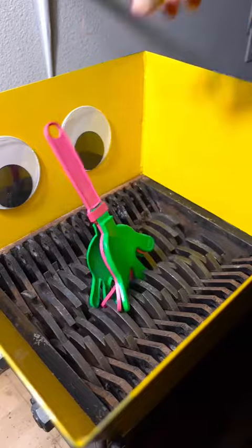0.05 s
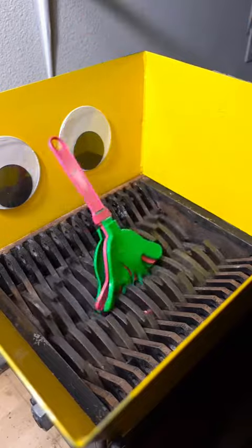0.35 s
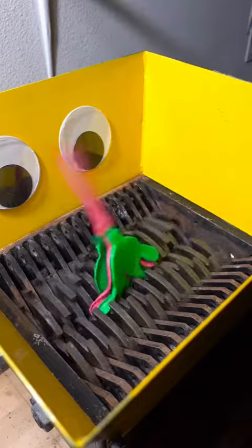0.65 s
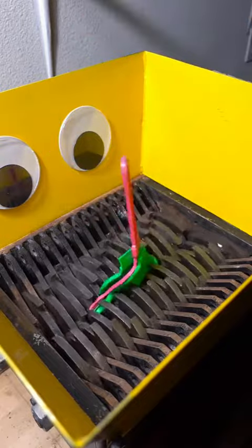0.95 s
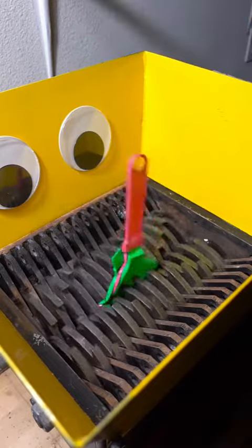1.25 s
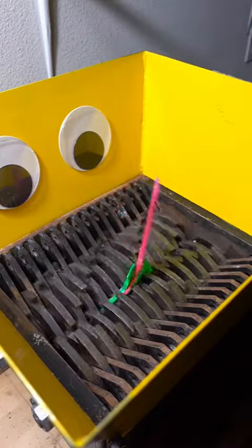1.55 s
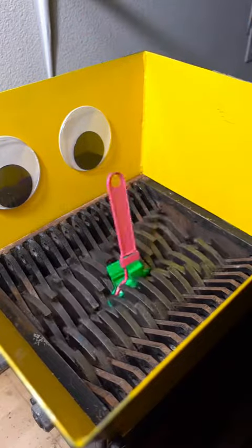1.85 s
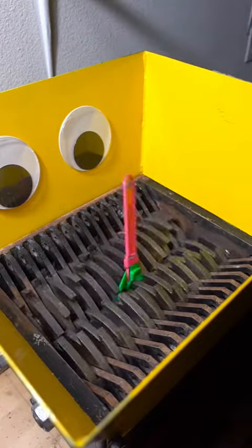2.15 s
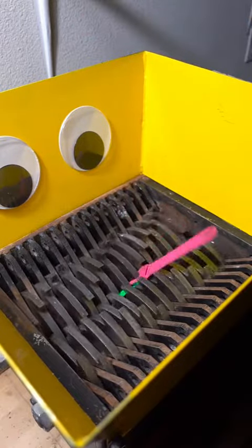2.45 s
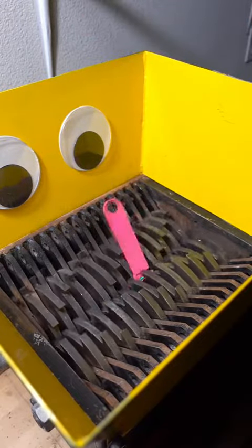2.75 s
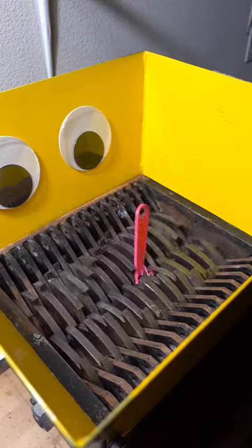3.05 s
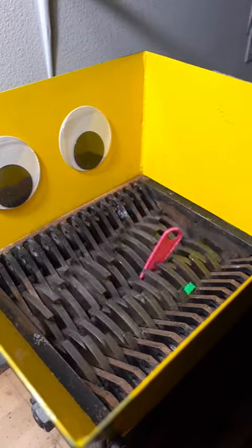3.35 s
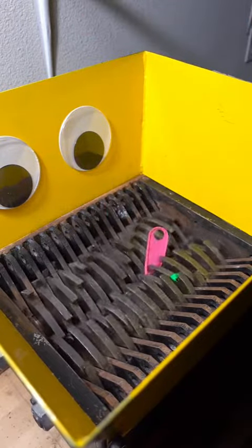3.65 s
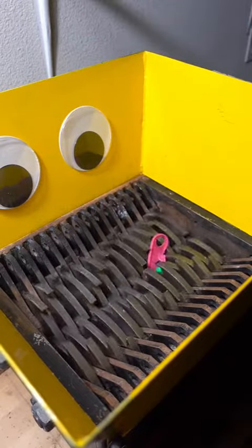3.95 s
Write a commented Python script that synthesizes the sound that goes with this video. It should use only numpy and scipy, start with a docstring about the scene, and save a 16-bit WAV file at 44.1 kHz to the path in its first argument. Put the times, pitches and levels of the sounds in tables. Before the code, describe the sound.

An industrial shredder crunches hard plastic with dense crackling and snaps over a machine hum.

```python
"""A twin-shaft shredder chews up a hard plastic toy, close to the microphone.
From the start, motor and gears hum under a dense crackle of tiny fractures and clicking splinters.
In the first second the bending plastic creaks; pieces start to snap, and the cutters thud until 2.2 s.
Snaps and crackle then thin out as the toy is used up, and the gears run on, louder.
Throughout, the steel hopper and the workshop add a bright tail to the breaking plastic."""
import sys
import numpy as np
from scipy import signal
from scipy.fft import rfft, irfft, next_fast_len
from scipy.io import wavfile
from scipy.ndimage import map_coordinates

SR = 44100
rng = np.random.default_rng(int(sys.argv[2]) if len(sys.argv) > 2 else 0)


def log_audio(samples):
    """Write samples as a 16-bit WAV file to the path given in sys.argv[1]."""
    # one column per channel
    frames = np.atleast_2d(samples).T
    # limit to full scale, then quantise
    limited = np.clip(frames, -1, 1)
    pcm = np.round(limited * 32767).astype(np.int16)
    wavfile.write(sys.argv[1], SR, pcm)


N = 176400

# Spectrum of a fracture. Each row: frequency in Hz, gain in dB.
CRACK_SPECTRUM = [(30, -26), (300, -14), (700, -7), (1300, -3), (2500, 1.5), (6200, 1.5), (6800, -2),
                  (10000, -2), (15500, -6)]
# Course of the crushing. Each row: time in seconds, relative levels of crackle and crunch in dB.
CRUSH_LEVELS = [(0, -16, -21.5), (.2, -29.5, -18), (.36, -20.5, -24.5), (.40, -26, -35), (.56, -23, -25.5),
                (.6, -26, -23.5), (.69, -18.5, -18.5), (.79, -25, -21), (.94, -20.5, -24.5),
                (1.11, -22.5, -23), (1.37, -25.5, -26), (1.43, -20.5, -27), (1.54, -23.5, -40),
                (1.65, -19.5, -30), (1.75, -25.5, -28.5), (2.01, -29.5, -32), (2.282, -25.5, -49),
                (2.41, -42, -39.5), (2.45, -29, -51), (2.622, -22.5, -33), (2.69, -31, -48.5),
                (2.8, -49.5, -33.5), (2.82, -26.5, -27.5), (2.95, -25.5, -36), (2.985, -45, -49),
                (3.041, -30, -29), (3.16, -55, -39.5), (3.4, -40, -38.5), (3.585, -51, -43),
                (3.61, -26, -45), (3.72, -42.5, -39.5), (3.95, -49, -43.5)]
PIECE_WIDTH = 0.229  # side over middle


def amp(db):
    """Decibels to gain."""
    return 10 ** (np.asarray(db) / 20)


def unit(x):
    """x at rms 1."""
    return x / np.sqrt(np.mean(x ** 2) + 1e-20)


def along(points, hz):
    """Interpolate (Hz, value) points on a log axis."""
    f, v = np.transpose(points)
    return np.interp(np.log(hz + 1), np.log(f + 1), v)


def curves(rows):
    """One value per sample for each column after the time."""
    times_s, *columns = np.transpose(rows)
    return [np.interp(np.arange(N) / SR, times_s, column) for column in columns]


def wobble(knots_per_s):
    """A smooth random curve."""
    return map_coordinates(rng.standard_normal(N // 40), [np.arange(N) * knots_per_s / SR], mode="wrap")


def filtered(x, response):
    """x through a complex frequency response."""
    n = x.shape[-1]
    padded = next_fast_len(n + n // 10, True)
    return irfft(rfft(x, padded) * response(np.fft.rfftfreq(padded, 1 / SR)), padded)[..., :n]


def coloured(x, spectrum):
    """Stereo x through a minimum-phase filter of the given (Hz, dB) shape."""
    size = 2048
    cepstrum = irfft(np.log(amp(along(spectrum, np.fft.rfftfreq(size, 1 / SR)))))
    cepstrum[1:size // 2] *= 2
    cepstrum[size // 2 + 1:] = 0
    impulse = irfft(np.exp(rfft(cepstrum)))
    return signal.oaconvolve(x, impulse[None], axes=1)[:, :x.shape[1]]


def resonance(f, hz, q):
    """Response at f of one damped mode."""
    return 1j * f * hz / (hz * hz - f * f + 1j * f * hz / q)


def ringing(x, hz, q):
    """x through two equal resonances in series, at rms 1."""
    return unit(filtered(x, lambda f: resonance(f, hz, q) ** 2))


def stereo(pair, width):
    """Two unrelated signals as middle and side."""
    return np.array([pair[0] + width * pair[1], pair[0] - width * pair[1]]) / np.hypot(1, width)


def add(track, start_s, sound):
    """Mix a sound in."""
    part = track[:, round(start_s * SR):][:, :sound.shape[-1]]
    part += sound[..., :part.shape[1]]


def machine():
    """Rattling gears ring the steel gearbox, the frame drones, the loaded motor gives a rough whine."""
    # Each row: time in seconds, levels of gears, drone and whine in dB.
    levels = [(0, -47.5, -49, -48), (2.6, -41.5, -58.5, -48), (3.15, -37.5, -45.5, -45.5),
              (3.78, -35.5, -60.5, -49), (4, -33.5, -40, -51)]
    # Gearbox noise. Each row: frequency in Hz, gain in dB.
    gear_spectrum = [(90, -35.5), (150, -21.5), (330, -3.5), (460, -7.5), (620, 3.5), (1050, -1.5),
                     (2700, -1), (3500, -13.5), (12000, -34)]
    # Steel modes rung by the meshing teeth. Each row: frequency in Hz, level against the noise in dB.
    gear_modes = [(140, -26.5), (361, -17), (561, -12.5), (1297, -13.5), (1450, -15), (1505, -12.5),
                  (1960, -8), (2385, -11.5), (2818, -9.5), (3015, -16)]
    whine_hz, bandwidth_hz, width = 676.5, 15.07, 0.104
    gears_db, drone_db, whine_db = curves(levels)
    flutter = amp(wobble(45))
    gears = flutter * unit(coloured(stereo(rng.standard_normal((2, N)), width), gear_spectrum))
    for hz, db in gear_modes:
        gears += amp(db) * ringing(stereo(rng.standard_normal((2, N)), width), hz, q=hz / bandwidth_hz)
    drone = ringing(rng.standard_normal(N), hz=333.4, q=2.6)
    whine = np.sin(2 * np.pi * whine_hz * np.arange(N) / SR)
    whine += ringing(rng.standard_normal(N), whine_hz, q=whine_hz / bandwidth_hz)
    return amp(gears_db) * gears + amp(drone_db) * drone + amp(whine_db) * unit(whine)


def crushing():
    """Surging clumps of tiny fractures: thin edges crackle brightly, thick walls crunch lower."""
    # Thin edges. Each row: frequency in Hz, gain in dB.
    crackle_spectrum = [(30, -14), (400, -16.5), (1200, -13), (3000, 4.5), (11000, 3), (15500, -1.5)]
    # Thick walls. Each row: frequency in Hz, gain in dB.
    crunch_spectrum = [(30, -23.5), (250, -27.5), (620, -6), (1000, -8), (2200, 2.5), (3500, 0),
                       (9000, -14.5)]
    fractures_per_s, clumps_per_s, surges_per_s = 5000, 200, 40
    crackle_db, crunch_db = curves(CRUSH_LEVELS)
    out, shared_clumps = np.zeros((2, N)), wobble(clumps_per_s)
    for db, spectrum, width in (crackle_db, crackle_spectrum, 0.936), (crunch_db, crunch_spectrum, 0.55):
        breaks = (rng.random((2, N)) < fractures_per_s / SR) * rng.standard_normal((2, N))
        clump_db = 5 * np.tanh((shared_clumps + wobble(clumps_per_s)) / 2)
        surge_db = 2 * wobble(surges_per_s)
        breaks *= amp(clump_db + surge_db)
        out += amp(db - 1.5) * unit(coloured(stereo(breaks, width), spectrum))
    return out


def fracture(length_s, hz, crack_db):
    """A crack runs as a volley of tiny breaks, hardest first, and rings the piece that gives way."""
    release_s, first_break_s, first_break_db = 0.00255, 0.000152, 5.5
    q, overtone_ratio, overtone_db = 7.43, 1.856, -25
    t = np.arange(SR // 30) / SR
    envelope = np.exp(-np.maximum(t - length_s, 0) / release_s)
    envelope *= amp(first_break_db * np.exp(-t / first_break_s))
    noise = rng.standard_normal((3, len(t)))
    breaks = envelope * noise[:2] * np.exp(0.584 * noise[2])  # log-normal spikes
    crack = coloured(stereo(breaks, PIECE_WIDTH), CRACK_SPECTRUM)
    ring = filtered(crack.mean(axis=0),
                    lambda f: resonance(f, hz, q) - amp(overtone_db) * resonance(f, hz * overtone_ratio, q))
    return np.sqrt(np.mean(envelope ** 2)) * unit(unit(ring) + amp(crack_db) * unit(crack))


def splinters():
    """Small pieces click off: a few loud and dry, and faint random ones that follow the crackle level."""
    # Each row: start in seconds, relative level in dB.
    loud_clicks = [(.019, -11.5), (0.105, -12.5), (0.128, -10), (.182, -14), (.269, -14), (.316, -21.5),
                   (0.575, -14.5), (.640, -18.5), (0.93, -12.5), (1.055, -9), (1.443, -11.5), (1.561, -13),
                   (1.61, -14.5), (1.781, -8.5), (1.954, -11.5), (2.375, -14.5), (2.435, -17.5),
                   (2.478, -15.5), (2.526, -16.5), (2.814, -17.5), (2.890, -20), (3.053, -18),
                   (3.396, -25.5)]
    splinter_hz, faint_per_s, longest_s = 3470, 55, 0.00265
    out, crackle_db = np.zeros((2, N)), curves(CRUSH_LEVELS)[0]
    draws = rng.random((400, 4))
    for start_s, db in loud_clicks:
        hz = splinter_hz * 2 ** rng.uniform(-1.25, 0.622)
        add(out, start_s, amp(db - 3.5) * fracture(length_s=0.0019, hz=hz, crack_db=20))
    for k, (delay, size, pitch, weakness) in enumerate(draws):
        start_s = (k + 2 * delay) / faint_per_s
        if start_s * SR < N:
            db = crackle_db[int(start_s * SR)] + 3.5 - 20 * weakness
            hz = splinter_hz * 2 ** (2 * pitch - 1)
            add(out, start_s, amp(db) * fracture(longest_s * size, hz, crack_db=0))
    return out


def creaks():
    """The wall bends and slips in quick, uneven jerks along a cutter, ringing the hollow shell."""
    # Each row: start in seconds, length in seconds, level in dB.
    bends = [(0.223, 0.1435, -20.5), (0.569, 0.0814, -20)]
    out, slips_per_s = np.zeros((2, N)), 450
    for start_s, length_s, db in bends:
        t = np.arange(int(length_s * SR)) / SR
        rate_hz = slips_per_s * amp(4 * wobble(slips_per_s)[:len(t)])
        slips = np.diff(np.floor(np.cumsum(rate_hz) / SR), prepend=0)
        jerks = stereo(slips * rng.standard_normal((2, len(t))), PIECE_WIDTH)
        swell = np.sqrt(np.abs(np.sin(np.pi * t / length_s)))
        add(out, start_s, amp(db) * swell * ringing(jerks, hz=2438, q=3.1))
    return out


def snaps():
    """The large pieces break one by one."""
    # Each row: start in seconds, nominal length in seconds, relative level in dB,
    # pitch of the piece in Hz, relative weight of the crack in dB.
    pieces = [(0.2888, 0.00605, -6, 2484, 0.5), (0.348, 0.0149, -14.5, 2120, 1.5),
              (0.473, 0.00292, -7.5, 3720, 6.5), (.493, 0.00132, -12.5, 2880, -4.5),
              (0.524, 0.0074, -9.5, 2150, 4), (.603, 0.00326, -6.5, 1380, 3.5),
              (0.712, 0.00407, -7.5, 4570, 14), (0.746, 0.0027, -11.5, 3340, -7.5),
              (0.8, 0.00208, -8, 1184, 1.5), (.841, 0.00345, -9.5, 2240, 2.5),
              (0.870, 0.0065, -9.5, 1640, 4.5), (0.954, 0.00388, -5.5, 2427, 8),
              (1.075, 0.004, -7, 2006, 1), (1.081, 0.0108, -12.5, 1298, 6),
              (1.092, 0.01056, -6.5, 2400, 10), (1.189, 0.00194, -8, 2860, 0),
              (1.21, 0.0142, -6.5, 1776, 3.5), (1.329, 0.00325, -8, 1308, -3),
              (1.345, 0.0036, -10.5, 2910, -19), (1.403, 0.00255, -8, 2996, 7.5),
              (1.712, 0.00554, -4.5, 3474, 7.5), (1.838, 0.00626, -14.5, 2050, 6.5),
              (1.891, 0.00333, -12, 4290, 5), (1.935, 0.00233, -10, 1546, 7),
              (2.042, 0.00892, -6, 2197, 2.5), (2.058, 0.0179, -13.5, 4660, 1.5),
              (2.153, 0.0092, -7.5, 1197, 16.5), (2.644, 0.00673, -7.5, 2382, -2.5),
              (2.72, 0.0052, -9.5, 2380, 6), (2.721, 0.0018, -12, 4400, -10),
              (2.777, 0.0024, -16.5, 3900, 9.5), (2.789, 0.003, -13, 2760, 9.5),
              (3.022, 0.00093, -12, 2760, 12.5), (3.598, 0.00276, -16.5, 2280, 2.5),
              (3.737, 0.0055, -15.5, 2310, 5.5), (3.871, 0.0022, -20, 2150, 0)]
    out = np.zeros((2, N))
    for start_s, length_s, db, hz, crack_db in pieces:
        add(out, start_s, amp(db - 3.5) * fracture(1.01 * length_s, hz, crack_db - 1))
    return out


def thuds():
    """Each bite through thick plastic gives the cutter block a broad, dead knock with a brief shudder."""
    # Each row: start in seconds, relative level in dB, upper edge of the knock in Hz.
    bites = [(0.291, -27, 170), (.803, -33.5, 500), (.859, -26.5, 500), (0.954, -32.5, 230),
             (.985, -25.5, 800), (1.008, -26.5, 800), (1.216, -29.5, 450), (1.713, -28, 600),
             (1.811, -20.5, 770), (2.156, -20.5, 704)]
    decay_s, shudder_db = 0.00209, -10.5
    out, t = np.zeros((2, N)), np.arange(SR // 20) / SR
    fade = np.exp(-t / decay_s)
    for start_s, db, hz in bites:
        shudder = stereo(fade * rng.standard_normal((2, len(t))), width=1)
        push = unit(t == 0) + amp(shudder_db) * unit(shudder)
        knock = filtered(push, lambda f: 1j * f / (hz / 10 + 1j * f) / (1 + 1j * f / hz) / (1 + .5j * f / hz))
        add(out, start_s, amp(db + 3.5) * np.sqrt(np.mean(fade ** 2)) * unit(knock))
    return out * amp([[-2], [1]])  # right of centre


def room(x):
    """The bright, diffuse tail of hopper and workshop, different at each ear and every third of a second."""
    # Each row: frequency in Hz, time to decay by 60 dB in seconds.
    decay_times = [(6000, 0.192), (14000, 0.05)]
    # Each row: frequency in Hz, gain in dB.
    tail_spectrum = [(200, -17), (3000, -9), (6000, -3.5), (14000, -0.5)]
    out, block = np.zeros((2, N)), SR // 3
    for start in range(0, N, block):
        hz, t, noise = signal.stft(rng.standard_normal((2, SR // 2)), SR, nperseg=256)
        decay_per_s = np.log(1000) / along(decay_times, hz)[:, None]
        fade = np.exp(-decay_per_s * t) * np.sqrt(2 * decay_per_s / SR)  # unit energy
        tail = signal.istft(noise * fade * amp(along(tail_spectrum, hz))[:, None], SR)[1]
        add(out, start / SR, signal.fftconvolve(x[:, start:start + block], tail, axes=1))
    return out


def scene():
    """Breaking plastic in its room, over the running machine."""
    running = machine()
    plastic = snaps() + creaks() + crushing() + thuds() + splinters()
    return plastic + room(plastic) + running


def record(dry):
    """The highest peaks are rounded off and the top of the treble is cut."""
    ceiling, top_hz = 1.04, 15850
    rounded = dry / (1 + np.abs(dry / ceiling) ** 6) ** (1 / 6)
    return filtered(rounded, lambda hz: hz < top_hz)


dry = scene()
out = record(dry)
log_audio(out)
```